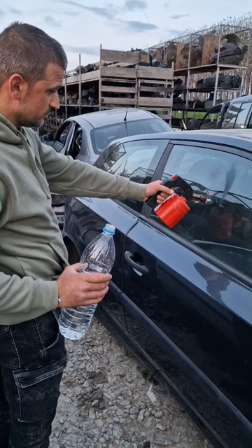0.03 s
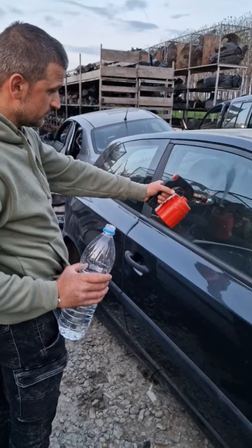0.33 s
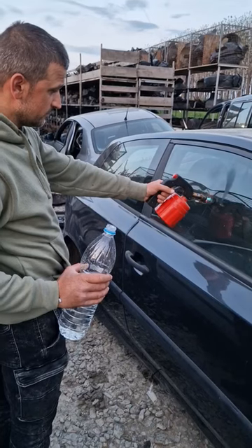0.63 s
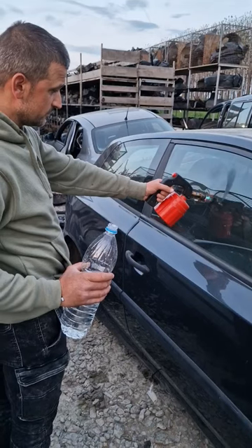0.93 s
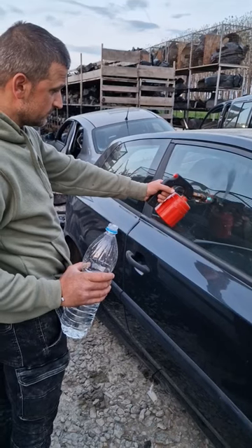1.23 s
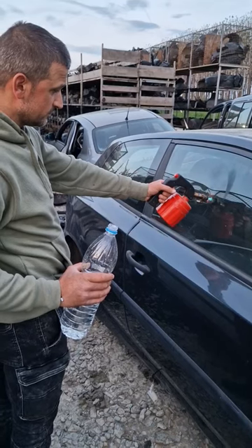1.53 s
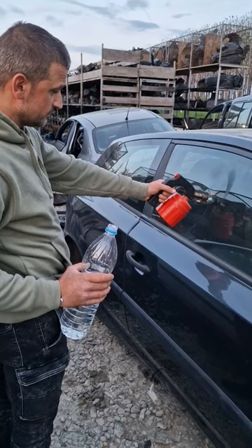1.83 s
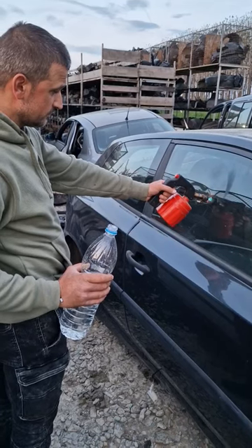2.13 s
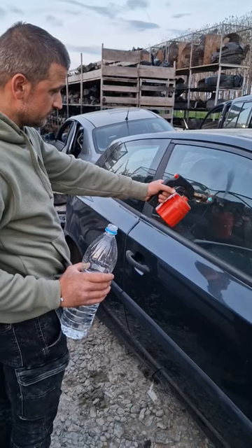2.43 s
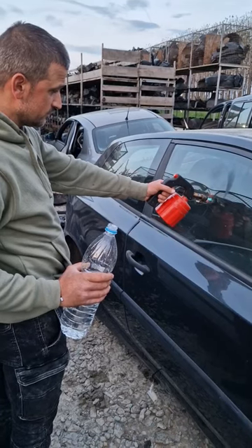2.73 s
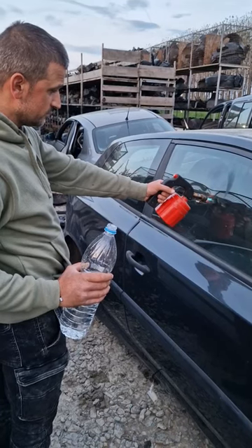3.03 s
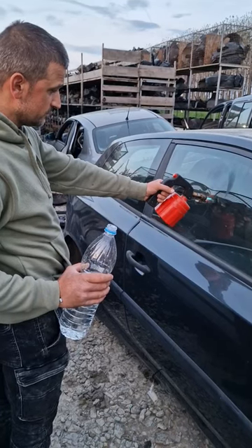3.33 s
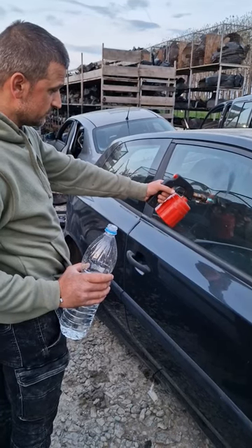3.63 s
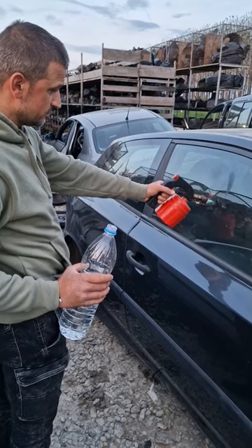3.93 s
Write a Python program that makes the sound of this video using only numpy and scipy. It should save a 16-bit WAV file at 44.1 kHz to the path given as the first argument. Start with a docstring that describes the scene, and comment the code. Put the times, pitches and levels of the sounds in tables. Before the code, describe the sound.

Steady roaring flame and thin hiss of a gas torch, with light gusts and faint ticks.

```python
"""A hand-held gas torch burns steadily at a car's side window in an open scrapyard, about a metre away.
The flame roars as countless tiny pockets of gas collapse, and the gas jet hisses from the nozzle.
Glass and door send both back a few ms later; the wrecks around add a short, weak scatter.
Light wind buffets the microphone over a low rumble, and there are a few faint ticks."""
import sys
import numpy as np
from scipy import signal
from scipy.fft import rfft, irfft
from scipy.io import wavfile
from scipy.ndimage import uniform_filter1d

SR = 44100
rng = np.random.default_rng(int(sys.argv[2]) if len(sys.argv) > 2 else 0)


def log_audio(samples):
    """Write samples as a 16-bit WAV file to the path given in sys.argv[1]."""
    # one column per channel
    frames = np.atleast_2d(samples).T
    # limit to full scale, then quantise
    limited = np.clip(frames, -1, 1)
    pcm = np.round(limited * 32767).astype(np.int16)
    wavfile.write(sys.argv[1], SR, pcm)


N = 176400
T, HZ = np.arange(N) / SR, np.arange(N // 2 + 1) * SR / N


def undb(db):
    """Decibels to gain."""
    return 10 ** (np.asarray(db) / 20)


def unit(x):
    """Scale to rms 1."""
    return x / np.sqrt(np.mean(x ** 2))


def curve(rows):
    """Gain over time from (s, dB) points."""
    return undb(np.interp(T, *np.array(rows).T))


def colour(x, spectrum):
    """Filter by (Hz, dB) points, then scale to rms 1."""
    hz, db = np.array(spectrum).T
    gain = undb(np.interp(np.log(HZ + 1), np.log(hz), db))
    return unit(irfft(rfft(x) * gain, N))


def noise(spectrum, channels=1):
    """Independent coloured noises."""
    return colour(rng.standard_normal((channels, N)), spectrum)


def wander(per_s):
    """Random steps, smoothed twice, at rms 1."""
    hold = int(SR / per_s)
    steps = rng.standard_normal(1000)[np.arange(N) // hold]
    return unit(uniform_filter1d(uniform_filter1d(steps, hold), hold))


def pan(db):
    """Stereo gains for a left-over-right level difference."""
    return undb(np.array([[db], [-db]]) / 2)


# Each row: frequency in Hz, relative level in dB.
RUMBLE_SPECTRUM = [(20, 9), (45, 29.5), (70, -10), (110, -2), (200, 14), (600, -45)]
def rumble(level_db=-59.5):
    """Steady low rumble of the yard."""
    return undb(level_db) * noise(RUMBLE_SPECTRUM)


# Each row: frequency in Hz, relative level in dB.
WIND_SPECTRUM = [(15, -41), (30, -4.5), (50, 5.5), (85, 2), (120, -3.5), (200, -5.5), (400, -13),
                 (1500, -67.5)]
# Each row: time in seconds, level in dB.
BREEZE_LEVELS = [(.1, -51), (.2, -52.5), (.5, -53.5), (.64, -47), (.94, -41), (.98, -46), (1.04, -42),
                 (1.35, -49.5), (1.6, -45.5), (1.85, -40), (1.99, -48.5), (2.2, -54.5), (2.32, -41),
                 (2.44, -42.5), (2.56, -54), (2.76, -46), (2.92, -43.5), (3.2, -42), (3.27, -44.5),
                 (3.38, -42), (3.5, -46.5), (3.68, -41), (3.76, -42), (3.9, -52), (4, -37.5)]
# Each row: start in seconds, rise in seconds, wobble in Hz, level in dB, left over right in dB.
EDDIES = [(.72, .009, 55, -40, 14), (0.808, 0.018, 65, -37.5, -15), (0.879, 0.0075, 97, -35.5, 19),
          (0.923, 0.0025, 65, -27, 4), (1.838, 0.0021, 101, -30.5, 17), (2.062, 0.0094, 55.6, -36, -5),
          (2.908, 0.014, 75, -32.5, 11), (2.99, 0.0068, 78.6, -21.5, 6), (3.014, 0.0047, 86, -27, 9),
          (3.045, .008, 79, -32, 13), (3.151, 0.02, 64.5, -34, 6), (3.329, 0.0063, 53.5, -21.5, 5.5),
          (3.636, .012, 51.5, -29.5, 12), (3.688, .008, 59.5, -36, 23), (3.803, 0.019, 52.7, -34, -4)]
def wind(spread=0.62, pan_db=4.5):
    """A breeze flutters on the microphone; single eddies suck at a port and leave a short, low wobble."""
    breeze = noise(WIND_SPECTRUM) + spread * noise(WIND_SPECTRUM, channels=2)
    out = breeze * curve(BREEZE_LEVELS) * pan(pan_db)
    for start, rise, hz, db, side_db in EDDIES:
        age = np.maximum(T - start, 0)
        envelope = undb(db) * age / rise * np.exp(1 - age / rise)
        out -= envelope * np.sin(2 * np.pi * hz * age) * pan(side_db)
    return out


# Each row: frequency in Hz, relative level in dB.
TICK_SPECTRUM = [(1500, -31), (4400, 6), (5300, 0.5), (7500, 6), (9500, -7), (11000, -18), (12200, -6),
                 (14500, -16)]
# Each row: start in seconds, level in dB, decay in seconds, treble shelf in dB.
TICK_EVENTS = [(0.499, -50.5, 0.0029, 1), (.9594, -67, .005, 12), (1.2644, -71, .007, 23),
               (2.897, -48.5, 0.014, -4), (2.967, -51, .004, -10), (2.981, -53, 0.008, -8),
               (3.016, -52, .003, -10), (3.053, -54, .004, -6), (3.146, -49.5, 0.0065, -15)]
def ticks(shelf_hz=9000):
    """Small dry clicks, perhaps a plastic bottle in the hand or grit underfoot."""
    shelf = HZ ** 4 / (HZ ** 4 + shelf_hz ** 4)
    out = 0
    for start, db, decay, treble_db in TICK_EVENTS:
        age = np.maximum(T - start, 0)
        envelope = undb(db) * (T >= start) * np.exp(-age / decay)
        burst = noise(TICK_SPECTRUM, channels=2) * envelope
        out = out + irfft(rfft(burst) * undb(treble_db * shelf), N)
    return out


def yard_scatter(x, level_db=-12, t60_s=0.3):
    """Wrecks and racks scatter the sound into a short, weak tail."""
    tail = rng.standard_normal((2, N)) * np.exp(-np.log(1000) * T / t60_s)
    return undb(level_db) * signal.fftconvolve(x[None], unit(tail) / np.sqrt(N), axes=1)[:, :N]


def delay(ms):
    """Frequency response of a pure delay."""
    return np.exp(-2j * np.pi * HZ * ms / 1000)


# Echoes per channel. Each row: delay in ms, signed gain.
CAR_ECHOES_LEFT = [(0.22, -0.19), (0.41, -0.18), (0.6, -0.26), (0.72, 0.17), (0.9, -0.36), (1.58, -0.11),
                   (1.81, -0.1), (1.9, -0.21), (2.09, 0.19), (2.22, 0.12), (3.17, 0.13), (3.41, -0.11),
                   (3.87, 0.07), (4.31, 0.18), (4.65, 0.15), (5.5, -0.17), (7.73, 0.08)]
CAR_ECHOES_RIGHT = [(0.16, -0.25), (1.05, -0.5), (1.5, -0.43), (1.85, 0.2), (2.63, 0.16), (3.77, -0.14),
                    (3.95, 0.32), (4.31, -0.16), (4.55, -0.15), (5.04, -0.24), (5.22, -0.11), (5.67, -0.08),
                    (5.97, -0.13), (6.41, -0.12), (9.76, 0.08)]
def car_side(x, right_lag_ms=0.085, dull_hz=7900):
    """Direct sound plus echoes off window, door and their edges: a hollow comb colour in each channel."""
    lowpass = 1 / (1 + (HZ / dull_hz) ** 2)
    left = 1 + lowpass * sum(gain * delay(ms) for ms, gain in CAR_ECHOES_LEFT)
    right = delay(right_lag_ms) + lowpass * sum(gain * delay(ms) for ms, gain in CAR_ECHOES_RIGHT)
    return irfft(rfft(x) * np.array([left, right]), N) / np.sqrt(2)


# Each row: frequency in Hz, relative level in dB.
JET_SPECTRUM = [(1500, -22), (3100, -16), (3900, 5.5), (4700, 8), (5500, 3.5), (6100, -0.5), (6450, 8),
                (6800, -12.5), (7500, 4.5), (8500, -6), (9100, -8), (9900, -14), (10400, -27), (11000, -27),
                (12000, -15), (15000, -20.5)]
def jet(burn, level_db=-60, flutter_db=1, spread=0.57):
    """Gas hisses from the nozzle: one part straight ahead, two scattered to the sides."""
    gain = undb(level_db + flutter_db * wander(per_s=21)) * unit(burn)
    hiss = noise(JET_SPECTRUM, channels=3) * gain
    return hiss[0], spread * hiss[1:]


# Each row: frequency in Hz, relative level in dB.
FLAME_SPECTRUM = [(40, -29), (130, -17.5), (230, -4), (330, -5.5), (460, -4.5), (620, -5.5), (850, -4.5),
                  (1050, -6), (1250, -8.5), (1550, -9.5), (1880, -10), (2060, -10), (2280, -15.5),
                  (2550, -14), (2800, -18.5), (3000, -28.5), (3250, -20.5), (3500, -16.5), (3900, -33.5),
                  (4600, -35.5), (6400, -31), (9000, -49), (12000, -79)]
def flame(burn, pops_per_s=2200, scatter_db=1.5, body_hz=553, surge_db=1.43, flutter_db=0.33):
    """Each burnt-out gas pocket gives a short pressure dip; together they roar, and the low body surges."""
    pops = (rng.random(N) < pops_per_s / SR) * undb(scatter_db * rng.standard_normal(N))
    smooth_noise = 0.23 * rng.standard_normal(N)
    roar = colour(smooth_noise - unit(pops - pops.mean()), FLAME_SPECTRUM)
    body = irfft(rfft(roar) / (1 + (HZ / body_hz) ** 4), N)
    top = roar - body
    surge = undb(surge_db * wander(per_s=20))
    flutter = undb(flutter_db * wander(per_s=21))
    return (top + body * surge) * burn * flutter


# Each row: time in seconds, flame level in dB.
BURN_LEVELS = [(.1, -37), (.8, -37), (1.7, -36.5), (2.3, -36.5), (2.75, -36), (2.95, -37.5), (3.2, -39),
               (3.45, -39), (3.7, -38.5), (4, -39)]
def torch():
    """Flame and jet, aimed at the glass, follow one burn strength and echo off the car and the yard."""
    burn = curve(BURN_LEVELS)
    roar = flame(burn)
    hiss_ahead, hiss_sides = jet(burn)
    ahead = roar + hiss_ahead
    return car_side(ahead) + hiss_sides + yard_scatter(ahead)


def scene():
    """The torch over wind, rumble and ticks."""
    return torch() + wind() + rumble() + ticks()


# Right microphone response. Each row: frequency in Hz, gain in dB.
RIGHT_RESPONSE = [(10000, 1.5), (12000, -10)]
def record(dry, start_s=0.085, fade_s=0.014, cutoff_hz=15300):
    """The microphones open after a brief silence, duller on the right, with the highest treble cut."""
    right_gain = undb(np.interp(HZ, *np.array(RIGHT_RESPONSE).T))
    ports = np.array([dry[0], irfft(rfft(dry[1]) * right_gain, N)])
    fade_in = np.clip((T - start_s) / fade_s, 0, 1)
    lowpass = signal.ellip(8, 0.2, 70, cutoff_hz, fs=SR, output="sos")
    return signal.sosfilt(lowpass, ports * fade_in)


dry = scene()
out = record(dry)
log_audio(out)
```